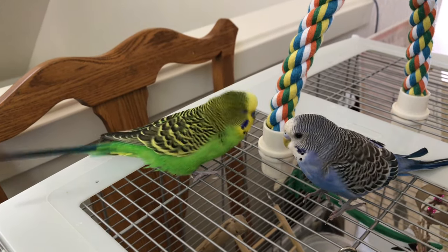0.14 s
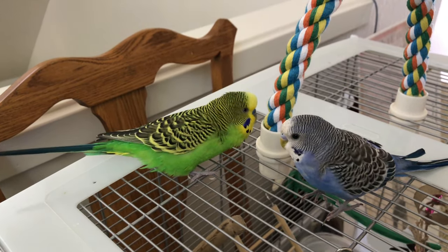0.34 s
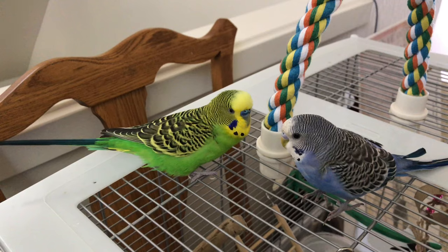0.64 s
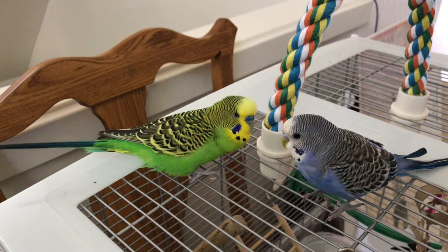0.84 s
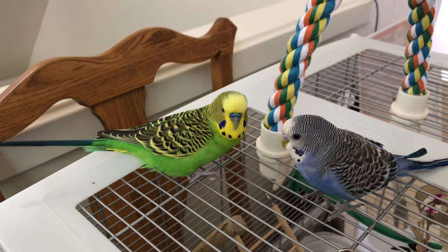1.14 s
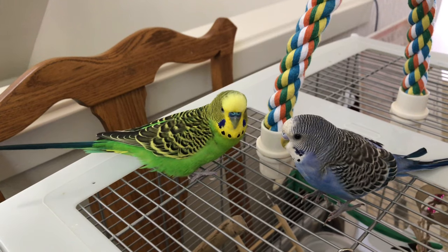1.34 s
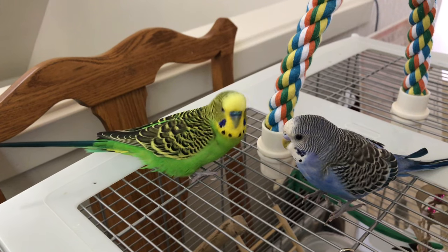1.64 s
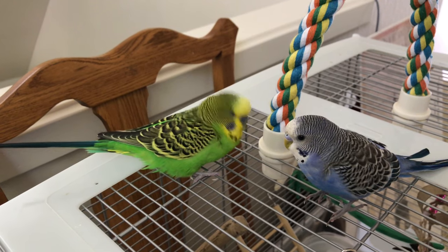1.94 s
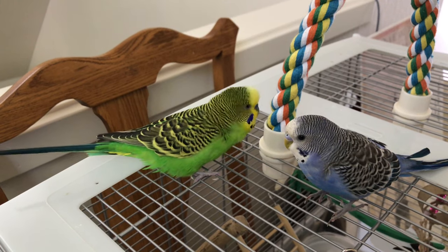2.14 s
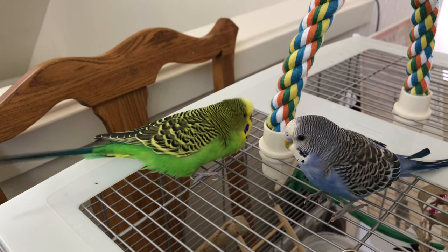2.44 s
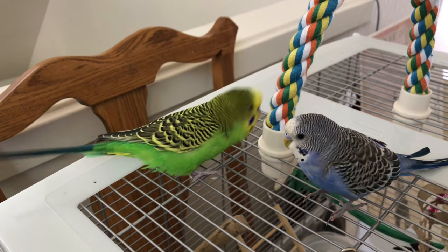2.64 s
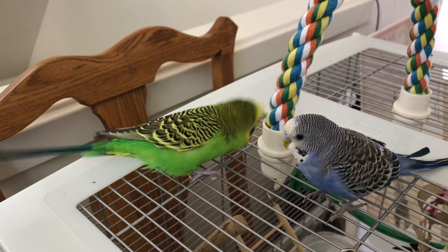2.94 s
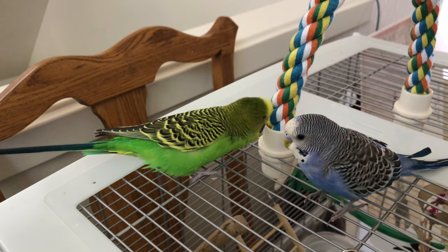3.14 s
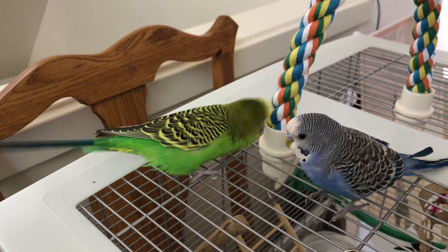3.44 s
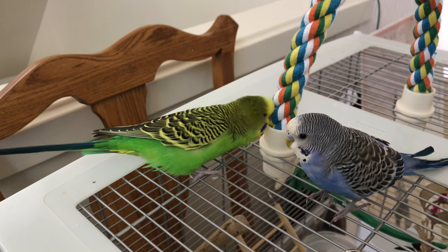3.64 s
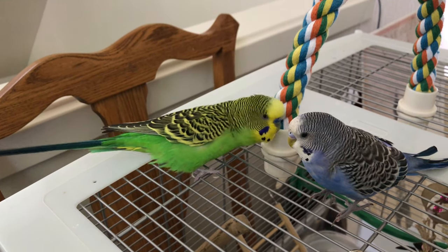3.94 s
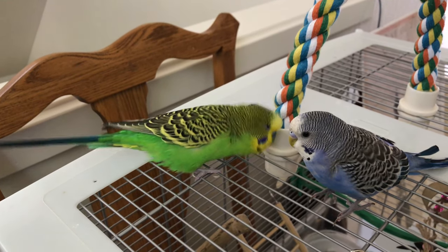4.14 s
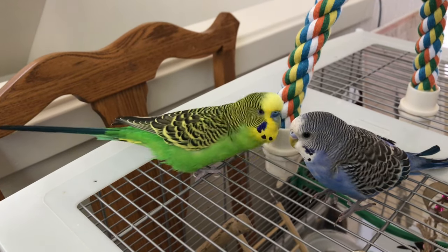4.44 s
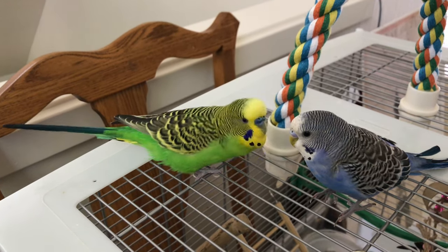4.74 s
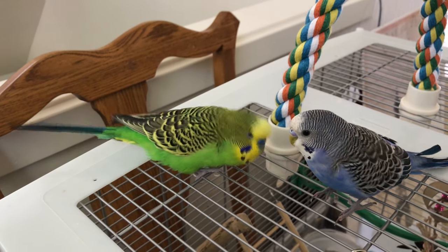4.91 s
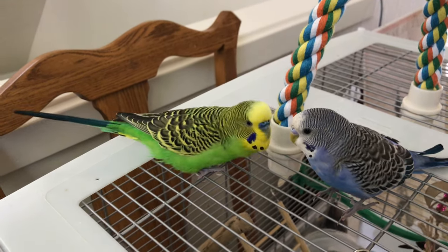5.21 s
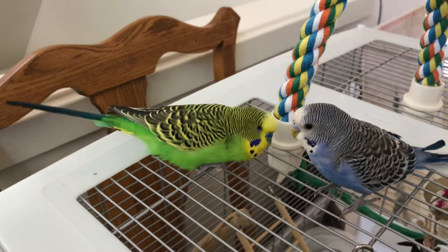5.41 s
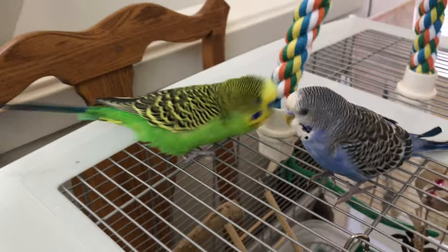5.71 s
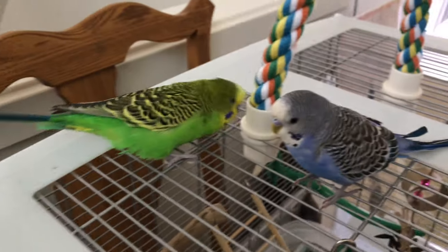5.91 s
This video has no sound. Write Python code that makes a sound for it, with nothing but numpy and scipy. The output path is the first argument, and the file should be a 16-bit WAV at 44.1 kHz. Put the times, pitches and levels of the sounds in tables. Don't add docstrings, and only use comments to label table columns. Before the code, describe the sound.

One small parrot sings close to a phone in a bare, lightly ringing room. A dry double click and tiny creak lead into a rapid bubbling trill, and the pattern repeats. Sparse clicks and slippery whistles follow, then a high ping, a hissing rasp and a dull chirp. A harsh squawk breaks out, and after it come evenly spaced buzzy chirps, several rising. A faint low hum stays underneath, with slight handling rumble late.

```python
import sys
import numpy as np
from scipy import signal
from scipy.fft import rfft, irfft, next_fast_len
from scipy.io import wavfile
from scipy.ndimage import uniform_filter1d

SR = 44100
rng = np.random.default_rng(int(sys.argv[2]) if len(sys.argv) > 2 else 0)


def wrap_up_sound(samples):
    columns = np.atleast_2d(samples).T
    tamed = np.clip(columns, -1, 1)
    steps = np.round(tamed * 32767).astype(np.int16)
    wavfile.write(sys.argv[1], SR, steps)


def amplitude_ratio(level_db):
    exponent = np.asarray(level_db, float) / 20
    return 10 ** exponent


N = 267598

# (time [s], pulse rate [Hz], chest level [dB])
RISING_CHIRPS = [
    [(3.727, 775, -52), (3.735, 787, -44), (3.757, 733, -50), (3.777, 821, -47.5), (3.805, 975, -50.5),
     (3.828, 1047, -52), (3.852, 1032, -47)],
    [(4.101, 772, -51), (4.109, 799, -41.5), (4.123, 755, -41.5), (4.151, 768.4, -44.5), (4.191, 831, -47),
     (4.232, 994, -50), (4.25, 967, -49)],
    [(5.688, 833, -40), (5.697, 833, -41), (5.703, 751, -40), (5.736, 846, -44.5), (5.748, 836, -47),
     (5.794, 1020, -51.5), (5.822, 1058, -47.5), (5.831, 1080, -47)],
]
# (time [s], windpipe level [dB], windpipe [Hz], mouth level [dB], mouth [Hz])
RISING_THROAT = [
    [(3.727, -43, 2620, -40, 3720), (3.733, -35, 2600, -42, 3660), (3.741, -44, 2730, -36, 3640),
     (3.773, -49, 2950, -40, 3920), (3.797, -54, 2940, -49.5, 4370), (3.827, -64, 3040, -50, 4470),
     (3.843, -37.5, 3070, -50, 4140), (3.852, -63, 3080, -66, 4150)],
    [(4.101, -38, 2610, -54, 3800), (4.111, -33.5, 2730, -35, 3800), (4.147, -53, 2560, -38.5, 3820),
     (4.205, -55.5, 2660, -48.5, 3900), (4.241, -41.5, 2800, -45, 3700), (4.25, -54, 2930, -68, 3920)],
    [(5.688, -47, 2620, -44, 4050), (5.696, -39.5, 2540, -35.5, 4160), (5.746, -49, 3200, -41, 4020),
     (5.764, -58, 3140, -52, 4340), (5.806, -50, 3220, -41.5, 4340), (5.82, -40, 3150, -53, 4150),
     (5.831, -64, 3140, -61, 4160)],
]
# (time [s], pulse rate [Hz], chest level [dB])
HELD_CHIRPS = [
    [(4.47, 946, -45), (4.478, 906, -44.5), (4.5, 930, -40), (4.536, 861, -43.5), (4.604, 838, -45),
     (4.617, 863, -48)],
    [(4.885, 778, -43), (4.895, 832, -38.5), (4.933, 781, -40.5), (4.967, 788, -45), (5.015, 823, -43),
     (5.027, 788, -47)],
    [(5.298, 700, -44), (5.304, 753, -44), (5.328, 818, -41), (5.356, 781, -43.5), (5.434, 887, -47),
     (5.445, 831, -50)],
]
# (time [s], windpipe level [dB], windpipe [Hz], mouth level [dB], mouth [Hz])
HELD_THROAT = [
    [(4.47, -58, 2760, -69, 4200), (4.476, -43.5, 2800, -41.5, 3890), (4.5, -44, 2840, -36.5, 4840),
     (4.53, -43, 2900, -43, 5080), (4.59, -48.5, 2550, -44.5, 4600), (4.608, -37.5, 2550, -54, 4020),
     (4.617, -45.5, 2570, -72, 3840)],
    [(4.885, -35, 3180, -44, 4180), (4.895, -46, 3120, -32, 4400), (4.907, -52, 3120, -38.5, 4560),
     (4.961, -51.5, 2370, -44, 4870), (5.005, -44, 2900, -67.5, 4460), (5.019, -43.5, 2740, -74.5, 4330),
     (5.027, -60.5, 2890, -72, 4280)],
    [(5.298, -53.5, 3070, -57, 3960), (5.304, -47, 3050, -50, 3900), (5.316, -41.5, 3000, -40, 4030),
     (5.35, -51, 2780, -40, 4100), (5.4, -48, 2770, -53.5, 3930), (5.428, -51, 2630, -47, 3400),
     (5.438, -37.5, 2640, -52, 3520), (5.445, -55, 2650, -66, 3460)],
]
# (time [s], pulse rate [Hz], chest level [dB])
DULL_CHIRP = [
    [(2.923, 706, -45.5), (2.938, 705, -36), (2.982, 628, -49.5), (3.0, 699, -43.5), (3.034, 922, -51.5),
     (3.046, 937, -55)],
]
# (time [s], windpipe level [dB], windpipe [Hz], mouth level [dB], mouth [Hz])
DULL_THROAT = [
    [(2.923, -48, 1850, -49, 2920), (2.941, -31, 1820, -46.5, 3030), (2.977, -37.5, 1870, -51, 2980),
     (2.993, -46.5, 1940, -59, 3030), (3.046, -68, 1920, -71, 3000)],
]
# (time [s], pulse rate [Hz], chest level [dB])
MUFFLED_CHIRPS = [
    [(4.361, 1110, -76), (4.369, 1180, -45.5), (4.376, 1118, -54), (4.38, 1077, -49), (4.387, 1050, -55)],
    [(5.948, 988, -51), (5.97, 954, -51.5), (5.976, 910, -54)],
    [(6.06, 890, -70), (6.068, 834, -40)],
]
# (windpipe level [dB], windpipe [Hz], mouth level [dB], mouth [Hz], windpipe at shutting [dB])
MUFFLED_THROAT = [(-42, 2250, -73, 4400, -42), (-48, 2200, -57.5, 3270, -62), (-37.5, 3150, -36, 4200, -60)]
# (windpipe fade [dB/s], mouth fade [dB/s], windpipe follows pitch [exponent], beak air [dB])
MUFFLED_MOVES = (350, 280, 1.3, -26)
# (time [s], pulse rate [Hz], chest level [dB])
CREAKS = [
    [(.111, 512, -54), (.128, 491, -51.5), (.135, 520, -49), (.1395, 510, -45)],
    [(.672, 480, -57), (.685, 440, -51), (.694, 506, -52.5), (.7035, 527, -49)],
]
# (time [s], windpipe level [dB], windpipe [Hz], mouth level [dB], mouth [Hz])
CREAK_THROAT = [
    [(.111, -71, 1000, -64, 3000), (.124, -64, 1000, -55, 2920), (.133, -60, 1400, -44.5, 2200),
     (.1395, -54, 1500, -47, 1900)],
    [(.672, -61, 900, -60, 2800), (.685, -49, 900, -49, 1820), (.694, -52, 990, -44.5, 2120),
     (.7035, -51, 1100, -38, 1500)],
]
# (time [s], pulse rate [Hz], effort [dB], mouth [Hz])
RASP = [(2.378, 229.4, -39.5, 3570), (2.388, 230.4, -32.5, 4560), (2.403, 227.4, -31.5, 5100),
        (2.43, 230.5, -40.5, 4380), (2.458, 227.6, -51, 4480), (2.501, 230, -60.5, 4400)]
# (chest level [dB], windpipe level [dB], windpipe [Hz], mouth level [dB], beak air [dB])
RASP_THROAT = (-60, -13.5, 2399, 4, -19)
# (time [s], pulse rate [Hz], effort [dB])
SCRAPE = [
    [(1.506, 230, -63), (1.536, 224.6, -48), (1.556, 232, -66)],
]
# (time [s], pulse rate [Hz], effort [dB])
LEAK = [
    [(.162, 226.4, -67), (.172, 226, -60), (.184, 226.4, -70)],
    [(.725, 232, -58), (.74, 232.6, -59), (.749, 237, -60)],
    [(.957, 235, -51), (.963, 238, -59), (.976, 231.3, -71)],
]
# (time [s], pulse rate [Hz], effort [dB])
PUFF = [
    [(1.797, 228, -76), (1.802, 233, -68), (1.813, 228, -71)],
    [(3.528, 230, -73), (3.54, 233, -66), (3.553, 230, -76)],
]
# (chest level [dB], windpipe level [dB], windpipe [Hz], mouth level [dB], mouth [Hz], beak air [dB])
SCRAPE_THROAT = (-40, -1.5, 2137, -38, 3700, -9)
LEAK_THROAT = (-44, -2, 2901, -19, 4500, -11.5)
PUFF_THROAT = (-40, -40, 2000, -40, 4000, 0.5)
# (time [s], slap rate [Hz], effort [dB], mouth [Hz], mouth ring [ms])
SQUAWK = [(3.446, 302, -21.5, 3530, 0.77), (3.4519, 314, -16.5, 4000, 0.4), (3.459, 328, -20.5, 3940, 1.9),
          (3.467, 328.7, -20.5, 3830, 2.1), (3.474, 326, -26.5, 4150, 1.8), (3.483, 337, -30, 4060, 2),
          (3.491, 350, -39, 4000, 1.4), (3.53, 520, -49.5, 3920, 1.2)]
# (time [s], peak level [dB], mouth [Hz])
SLAPS = [(3.4283, -41.5, 4300), (3.43, -28.5, 3420), (3.434, -28, 2500), (3.4352, -34, 3600),
         (3.4385, -28, 3300), (3.4394, -36, 2200), (3.4404, -35, 3600), (3.4435, -29.5, 4300)]
# (frequency [Hz], level against the effort [dB], ring time [ms])
SQUAWK_MODES = [(930, -20, 1.0), (2800, -24, 0.83), (4780, -11.5, 0.58), (6900, -13.5, 0.27)]
# (start [s], loudest [s], end [s], level [dB], pitch [Hz])
TRILL = [(0.206, 0.217, 0.23, -35, 1634), (0.255, 0.262, 0.27, -42, 1580), (.302, 0.301, .326, -41.5, 1597),
         (0.342, 0.348, .375, -36.5, 1662), (.7645, .772, .795, -36, 1620),
         (0.8175, 0.832, .846, -35, 1620), (0.867, 0.873, .895, -38, 1602),
         (0.9135, 0.929, 0.941, -38, 1618)]
# (time [s], pitch [Hz], level [dB])
WHISTLES = [
    [(1.515, 1812, -57), (1.539, 1546, -46), (1.556, 1410, -83)],
    [(1.762, 2275, -42.5), (1.775, 1835, -39), (1.788, 1990, -44.5), (1.792, 1840, -40.5),
     (1.798, 1760, -46.5)],
    [(1.836, 2070, -70), (1.844, 2200, -55.5), (1.858, 2060, -81)],
    [(2.262, 3790, -57), (2.279, 3960, -49.5), (2.286, 2900, -36.5), (2.29, 2300, -39.5),
     (2.3, 1990, -44.5), (2.308, 2150, -53), (2.312, 2020, -41.5), (2.319, 2240, -45.5)],
    [(2.32, 3120, -35.5), (2.322, 3150, -30.5), (2.324, 3150, -33.5), (2.3275, 3177, -22),
     (2.3295, 3140, -24), (2.3335, 3150, -41)],
]
# (time [s], pitch [Hz], level [dB])
THROBBING = [
    [(2.333, 2700, -38), (2.337, 2960, -34), (2.34, 3170, -28.5), (2.346, 3050, -48.5)],
    [(2.369, 3100, -42), (2.372, 3380, -35.5), (2.378, 3460, -49)],
]
# (time [s], pitch [Hz], level [dB])
MURMURS = [
    [(2.095, 497, -53.5), (2.127, 491, -52), (2.159, 540, -57), (2.172, 560, -61)],
    [(2.638, 616, -55), (2.668, 489, -54), (2.68, 455, -57), (2.75, 388, -68)],
]
# (time [s], pitch [Hz], level [dB])
SQUEAKS = [
    [(1.748, 3560, -70.5), (1.757, 3330, -60), (1.765, 3380, -62.5)],
    [(1.801, 2980, -51), (1.809, 2905, -49), (1.826, 2764, -55.5)],
]
# (time [s], pitch [Hz], level [dB])
CLUCK = [
    [(2.6306, 2110, -56), (2.633, 1730, -23), (2.636, 1420, -36), (2.642, 1516, -49)],
]
# (time [s], pitch [Hz], level [dB], upper tone against it [dB])
BURRS = [
    [(.1555, 1700, -30, -2), (.158, 1700, -36, -5), (.1615, 1650, -53, -9)],
    [(.1625, 1630, -38, -7), (.169, 1700, -30, -10.5), (.176, 1530, -41, -7), (.183, 1446, -41, -1),
     (.187, 1430, -50, -6)],
    [(.718, 1510, -46, 1), (.7225, 1560, -35, 0), (.7245, 1600, -42, -1)],
    [(.7255, 1635, -43, -12), (.732, 1705, -30, -6), (.7415, 1660, -38, -9), (.745, 1710, -27.5, -11.5),
     (.753, 1600, -52, -14)],
]
# (time [s], pitch [Hz], level [dB])
BURR_HUM = [
    [(.163, 510, -65), (.174, 496, -51.5), (.186, 477, -60)],
    [(.726, 514, -56), (.738, 473, -49), (.75, 510, -65)],
    [(3.47, 326, -54), (3.5, 448, -54), (3.537, 662, -65)],
]
# (time [s], peak level [dB], ring [Hz], ring time [ms])
RINGING_POPS = [(0.2007, -25.5, 1810, 3.7), (0.2493, -35, 1840, 2.6), (0.2934, -37, 1860, 5.4),
                (.388, -36.5, 2100, 3.6), (0.816, -38, 1830, 3.2), (0.8604, -35, 1920, 5),
                (0.9093, -37.5, 1850, 3.6), (0.955, -34, 2185, 4.9), (1.178, -60.5, 1510, 6.3),
                (2.348, -32.5, 2530, 4.8), (2.354, -33, 2490, 4.2), (2.361, -38.5, 2480, 8.4)]
# (time [s], peak level [dB], ring [Hz], crack against the ring [dB])
CRACKING_POPS = [(1.505, -55.5, 4380, 11.5), (1.523, -48, 3030, 2), (1.534, -45, 3020, -4),
                 (1.5397, -53.5, 2760, 9), (2.0849, -45.5, 4730, 5.5), (2.134, -61, 4350, 7.5),
                 (2.4966, -43.5, 2200, -5), (2.6321, -34.5, 3200, 8)]
# (time [s], peak level [dB], ring [Hz], ring time [ms])
SNAPS = [(0.106, -42, 2350, 0.29), (0.1083, -29.5, 2370, 1.6), (0.1081, -31, 4850, 0.63),
         (0.6673, -40.5, 2860, 0.65), (0.6687, -36.5, 1720, 0.34), (2.0796, -28.5, 2440, 0.32),
         (2.0813, -36, 2300, 0.27), (2.9207, -31, 2000, 0.47), (2.9212, -36, 2520, 0.99),
         (2.9199, -31.5, 2240, 0.99), (3.1716, -36, 4170, 0.29), (3.7216, -30, 2900, 1.1),
         (4.0949, -28.5, 2950, 1.5), (4.0957, -35, 1700, .8), (4.3504, -32, 2480, 0.14),
         (4.4596, -31.5, 2090, 0.48), (4.462, -31.5, 2040, 0.76), (4.4625, -35, 2130, 0.41),
         (4.8735, -18.5, 3850, 0.38), (4.8744, -13, 4160, 0.95), (4.8755, -22, 1900, 1.03),
         (5.2881, -28, 2200, 0.89), (5.2896, -29, 1900, 0.5), (5.6812, -30.5, 2540, 0.83),
         (5.6834, -24.5, 2640, 0.89), (5.9373, -35.5, 2600, 0.74), (6.0524, -37.5, 3000, 0.28)]
# (frequency [Hz], level [dB])
BEAK_AIR = [(4300, -23), (5500, -6.5), (6400, -1.5), (8600, 1), (11000, -5), (13000, -11.5), (16000, -12)]
# (frequency [Hz], level [dB])
CRACK = [(500, -48), (1300, 6), (3000, 0.5), (5400, -6), (6500, -14), (9000, -18), (16000, -36)]
# (frequency [Hz], level [dB])
WALLS = [(300, -16), (1000, 2.5), (2000, 0), (4500, -1), (7000, 0), (16000, -10)]
# (frequency [Hz], density [dB per Hz])
AIR = [(20, -49), (49, -16.5), (92, -11), (115, -9), (320, -7), (620, -16), (2050, -29.5), (16000, -40)]
# (frequency [Hz], density [dB per Hz])
AIR_SIDE = [(20, -34), (127, -4), (354, -6), (451, -9), (700, -14), (3250, -28.5), (12500, -35),
            (16000, -50)]
# (frequency [Hz], centre level [dB], side level [dB], wander [Hz])
HUM = [
    (119.8, -65, -99, 0.48),
    (459.1, -63.5, -76.5, 0.37),
]
# (time [s], level [dB])
GRIP = [
    [(1.24, -80), (1.274, -59), (1.31, -79)],
    [(4.98, -89), (5.07, -65.5), (5.352, -55), (5.56, -66.5), (5.644, -73.5), (6.068, -71.5)],
]
# (centre [Hz], width [Hz], level [dB])
GRIP_BANDS = [
    (62, 34, -1.5),
    (131.5, 32, 6),
]


def on_log(hz, points):
    f, db = np.transpose(points)
    return amplitude_ratio(np.interp(np.log(np.maximum(hz, 1)), np.log(f), db))


def colour(x, points):
    size = next_fast_len(x.shape[-1])
    gain = on_log(np.fft.rfftfreq(size, 1 / SR), points)
    y = irfft(rfft(x, size) * gain, size)[..., :x.shape[-1]]
    return y / np.sqrt(np.mean(y ** 2))


def band(x, order, hz, kind):
    return signal.sosfilt(signal.butter(order, hz, kind, fs=SR, output="sos"), x)


def walk(rate_hz, size):
    k = max(int(SR / rate_hz), 1)
    steps = np.repeat(rng.standard_normal(size // k + 1), k)[:size]
    return np.sqrt(2) * uniform_filter1d(uniform_filter1d(steps, k), k)


def unfold(note, edge_s):
    s, *columns = np.transpose(note)
    t = np.arange(int(s[0] * SR), min(int(s[-1] * SR), N)) / SR
    edge = np.clip(np.minimum(t - s[0], s[-1] - t) / edge_s, 0, 1)
    return int(s[0] * SR), np.sin(np.pi / 2 * edge) ** 2, [np.interp(t, s, c) for c in columns]


def unit(gain):
    return gain / np.sqrt(np.sum(np.abs(gain) ** 2, axis=0) / 2)


def resonance(hz, centre_hz, width_hz):
    ring = 1 / (1 + 1j * (hz ** 2 - centre_hz ** 2) / (hz * width_hz)) ** 2
    return unit(ring / (1 + (hz / (centre_hz + 0.59 * width_hz)) ** 10))


def buzz(notes, width_hz, jitter, rough, breath, hiss, waver_db=2.0):
    out = np.zeros(N)
    for note in notes:
        i, edge, (hz, chest_db, pipe_db, pipe_hz, mouth_db, mouth_hz, air_db) = unfold(note, 0.002)
        size = len(hz)
        phase = 2 * np.pi * np.cumsum(hz * (1 + jitter * walk(hz.mean() / 2, size))) / SR
        k = np.arange(2, 16000 // hz.min() + 1)[:, None]
        f = k * hz
        pipe = amplitude_ratio(pipe_db) * resonance(f, pipe_hz, width_hz)
        mouth = amplitude_ratio(mouth_db) * resonance(f, mouth_hz, 1.205 * width_hz)
        air = amplitude_ratio(air_db) * unit(on_log(f, BEAK_AIR) * (f < 16500))
        uneven = 1 + rough * walk(hz.mean(), size)
        smear = np.array([walk(hz.mean(), size) + 1j * walk(hz.mean(), size) for _ in k])
        start = 0.22 * np.exp(-np.arange(size) / (0.015 * SR))
        share = breath + start + hiss * np.clip((f - 5000) / 3000, 0, 1) ** 2
        waver = amplitude_ratio(waver_db * np.array([walk(36.2, size) for _ in k]))
        gain = (pipe - mouth + air) * waver
        gain = gain * (1 + share * smear) / np.sqrt(1 + 2 * share ** 2)
        chest = np.cos(phase) + amplitude_ratio(-10.5) * waver[0] * np.sin(2 * phase)
        upper = uneven * np.real(np.sum(gain * np.exp(1j * k * phase), axis=0))
        out[i:i + size] += edge * (upper + amplitude_ratio(chest_db) * np.sqrt(2) * chest)
    return out


def moving_throat(curves, throats, air_db):
    notes = []
    for curve, throat in zip(curves, throats):
        when, hz, chest_db = np.transpose(curve)
        at, *tract = np.transpose(throat)
        s = np.linspace(when[0], when[-1], num=80)
        pipe, pipe_hz, mouth, mouth_hz = (np.interp(s, at, c) for c in tract)
        air = np.maximum(pipe, mouth) + air_db
        hz, chest = np.interp(s, when, hz), np.interp(s, when, chest_db)
        notes.append(np.transpose([s, hz, chest, pipe, pipe_hz, mouth, mouth_hz, air]))
    return notes


def closing_beak(curves, throats, moves):
    opens_s, opens_db = 0.011, -8
    shuts_s, shuts_db, swell_db_s = 0.011, -25, 451
    pipe_fade, mouth_fade, follow, air_db = moves
    notes = []
    for curve, (pipe_db, pipe_hz, mouth_db, mouth_hz, shut_db) in zip(curves, throats):
        when, hz, chest_db = np.transpose(curve)
        s = np.linspace(when[0], when[-1], num=80)
        hz, chest = np.interp(s, when, hz), np.interp(s, when, chest_db)
        age, left = s - s[0] - opens_s, s[-1] - s - shuts_s
        opening = opens_db * np.maximum(-age, 0) / opens_s
        shutting = shuts_db * np.maximum(-left, 0) / shuts_s
        pipe = np.maximum(pipe_db - pipe_fade * abs(age), shut_db - swell_db_s * abs(left))
        mouth = mouth_db + opening - mouth_fade * np.maximum(age, 0) + shutting
        air = np.maximum(mouth, pipe_db + opening - pipe_fade * np.maximum(age, 0)) + air_db
        pipe_hz = pipe_hz * (hz / hz[0]) ** follow
        notes.append(np.transpose([s, hz, chest, pipe, pipe_hz, mouth, mouth_hz + 0 * s, air]))
    return notes


def chirps():
    held = moving_throat(HELD_CHIRPS, HELD_THROAT, -25.5)
    rising = moving_throat(RISING_CHIRPS, RISING_THROAT, -25.5)
    muffled = closing_beak(MUFFLED_CHIRPS, MUFFLED_THROAT, MUFFLED_MOVES)
    dull = moving_throat(DULL_CHIRP, DULL_THROAT, -23.5)
    out = buzz(held, 1350, jitter=0.003, rough=0.07, breath=0.08, hiss=1, waver_db=2)
    out += buzz(rising, 1150, jitter=0.004, rough=0.1, breath=0.09, hiss=2.2, waver_db=2.5)
    out += buzz(muffled, 700, jitter=0.012, rough=0.15, breath=0.1, hiss=2.2, waver_db=2.2)
    return out + buzz(dull, 1350, jitter=0.004, rough=0.06, breath=0.08, hiss=4, waver_db=1)


def effort_notes(curves, throat):
    chest_db, pipe_db, pipe_hz, mouth_db, mouth_hz, air_db = throat
    notes = []
    for s, hz, db in map(np.transpose, curves):
        air = db + air_db + 0.25 * (db - db.max())
        notes.append(np.transpose([s, hz, db + chest_db, db + pipe_db, pipe_hz + 0 * s,
                                   db + mouth_db, mouth_hz + 0 * s, air]))
    return notes


def creaks_and_rasps():
    creaks = moving_throat(CREAKS, CREAK_THROAT, -23)
    rasp = np.array(RASP)
    rasp = effort_notes([rasp[:, :3]], (*RASP_THROAT[:4], rasp[:, 3], RASP_THROAT[4]))
    leaks = effort_notes(LEAK, LEAK_THROAT) + effort_notes(SCRAPE, SCRAPE_THROAT)
    leaks += effort_notes(PUFF, PUFF_THROAT)
    out = buzz(creaks, 1300, jitter=0.03, rough=0.2, breath=0.22, hiss=0.9)
    out += buzz(rasp, 1900, jitter=0.04, rough=0.08, breath=1.1, hiss=0.9, waver_db=1)
    return out + buzz(leaks, 2000, jitter=0.04, rough=0.2, breath=1.1, hiss=0.9)


def squawk():
    s, rate_hz, *rest = np.transpose(SQUAWK)
    t = np.arange(s[0], s[-1], 1 / SR)
    cycle = np.floor(np.cumsum(np.interp(t, s, rate_hz)) / SR)
    at = t[np.flatnonzero(np.diff(cycle, prepend=-1))]
    effort, mouth_hz, ring_ms = (np.interp(at, s, c) for c in rest)
    low = 0.66 * (max(rest[0]) - effort)
    rows = [(*row, 0.63, 16) for row in SLAPS]
    rows += list(zip(at, effort, mouth_hz, ring_ms, low))
    out, t = np.zeros(N), np.arange(1024) / SR
    puffs = colour(rng.standard_normal((len(rows), 1024)), CRACK)
    scatter = rng.standard_normal((len(rows), 7))
    shut = np.exp(-(t / 0.0028) ** 4)

    def ring(hz, ms):
        return np.sin(2 * np.pi * hz * t) * np.exp(-t * 1000 / ms) * shut

    for (when, db, hz, ms, low_db), puff, luck in zip(rows, puffs, scatter):
        slap = ring(hz * (1 + 0.02 * luck[0]), ms) + amplitude_ratio(-18) * puff * np.exp(-t / 0.0015)
        for (f, mode_db, mode_ms), c in zip(SQUAWK_MODES, luck[3:]):
            slap += amplitude_ratio(mode_db + low_db * (f < 1500) + 2 * c) * ring(f * (1 + 0.03 * c), mode_ms)
        i = int((when + 0.0001 * luck[1]) * SR)
        out[i:i + len(t)] += amplitude_ratio(db + luck[2]) * slap * (1 - np.exp(-t / 0.000061))
    return band(out, 2, 500, "high")


def whistle(notes, throb, throb_hz, rough, second_db):
    out = np.zeros(N)
    for note in notes:
        i, edge, (hz, db) = unfold(note, 0.0016)
        size = len(hz)
        beat = np.cumsum(throb_hz * (1 + 0.14 * walk(80, size))) / SR
        sag = 1 - 0.032 * throb * (beat % 1 - 0.5)
        phase = 2 * np.pi * np.cumsum(hz * sag * (1 + 0.011 * walk(340, size))) / SR
        swell = 1 - throb * np.cos(2 * np.pi * beat) + rough * walk(1500, size)
        over = amplitude_ratio(second_db) * (np.sin(2 * phase) + 0.17 * np.sin(3 * phase))
        over = over * (1 + 4 * rough * walk(800, size))
        out[i:i + size] += edge * amplitude_ratio(db) * np.sqrt(2) * swell * (np.sin(phase) + over)
    return out


def trill():
    hold_s, slope_db_s, sag_hz_s = 0.0011, 385, 2000
    notes = []
    for start, loudest, end, top_db, hz in TRILL:
        s = np.linspace(start, end, num=40)
        db = top_db - slope_db_s * np.maximum(abs(s - loudest) - hold_s, 0)
        notes.append(np.transpose([s, hz - sag_hz_s * (s - loudest), db]))
    return whistle(notes, 0.12, 110, 0.05, -33)


def burrs():
    beat_hz, under_db = 487, -26.5
    notes = []
    for s, hz, db, up_db in map(np.transpose, BURRS):
        notes.append(np.transpose([s, hz, db]))
        notes.append(np.transpose([s, hz + beat_hz, db + up_db]))
        notes.append(np.transpose([s, hz - beat_hz, db + under_db]))
    return whistle(notes, 0.05, 250, 0.08, -40)


def whistles():
    out = trill() + burrs()
    out += whistle(WHISTLES, 0.15, 140, 0.1, -40)
    out += whistle(THROBBING, 0.6, 170, 0.15, -36)
    out += whistle(MURMURS + BURR_HUM, 0.13, 56, 0.24, -13.5)
    out += whistle(SQUEAKS, 0.39, 140, 0.2, -23.5)
    return out + band(whistle(CLUCK, 0.05, 140, 0.09, -2), 3, 1600, "high")


def pops():
    rows = [(*row, -26) for row in RINGING_POPS]
    rows += [(s, db, hz, 3.2, crack_db) for s, db, hz, crack_db in CRACKING_POPS]
    out, t = np.zeros(N + 2048), np.arange(2048) / SR
    cracks = colour(rng.standard_normal((len(rows), 2048)), CRACK)
    rise = 1 - np.exp(-t / 0.00028)
    for (s, db, hz, ring_ms, crack_db), noise in zip(rows, cracks):
        ring = np.sin(2 * np.pi * hz * t * (1.05 - 12 * t)) * np.exp(-(t * 1000 / ring_ms) ** 3.3)
        noise = band(noise, 2, 0.55 * hz, "high")
        crack = amplitude_ratio(crack_db) * noise * (np.exp(-t / 0.0013) + 0.23 * np.exp(-t / 0.0094))
        out[int(s * SR):int(s * SR) + 2048] += amplitude_ratio(db) * rise * (ring + crack)
    return out[:N]


def snaps():
    out, t = np.zeros(N + 2048), np.arange(2048) / SR
    puffs = colour(rng.standard_normal((len(SNAPS), 2048)), CRACK)
    edge = amplitude_ratio(-28.5) * np.sin(2 * np.pi * 8500 * t) * np.exp(-t / 0.000058)
    for (s, db, hz, ring_ms), noise in zip(SNAPS, puffs):
        fade = np.exp(-t * 1000 / ring_ms)
        upper_hz = min(2.008 * hz, 5530)
        upper = amplitude_ratio(-10.5) * fade * np.sin(2 * np.pi * upper_hz * t)
        ring = fade * (np.sin(2 * np.pi * hz * t) + upper)
        air = amplitude_ratio(-16.5) * noise * np.exp(-t / 0.0042)
        out[int(s * SR):int(s * SR) + 2048] += amplitude_ratio(db) * (ring + edge + air)
    return band(out[:N], 2, (700, 9000), "band")


def at_ports(bird):
    pan_db = 1.5
    wires = rng.standard_normal(1200) * np.exp(-np.arange(1200) / 250)
    treble = band(bird, 2, (6500, 10900), "band")
    treble = treble + amplitude_ratio(-9.5) * band(bird, 2, (2200, 6500), "band")
    scatter = amplitude_ratio(-5) * signal.fftconvolve(treble, wires / np.linalg.norm(wires))[:N]
    return bird * amplitude_ratio(np.array([[0.5], [-0.5]]) * pan_db) + scatter * np.array([[1], [-1]])


def walls(x):
    gap_s, level_db, side_db = 0.0011, -18, -7
    t = np.arange(SR) / SR
    far = 1000. ** (-t / 0.56)
    near = amplitude_ratio(8) * 1000. ** (-t / 0.07)
    mid, side = colour(rng.standard_normal((2, SR)), WALLS) * (t > gap_s) * (far + near)
    scale = amplitude_ratio(level_db) / np.sqrt(np.sum(mid ** 2))
    side = side * amplitude_ratio(side_db)
    return np.array([signal.fftconvolve(x, scale * tail)[:N] for tail in (mid + side, mid - side)])


def grip():
    s, db = np.transpose(sum(GRIP, []))
    n = np.arange(N)
    held = np.any([(n > g[0][0] * SR) & (n < g[-1][0] * SR) for g in GRIP], axis=0)
    level = uniform_filter1d(held * amplitude_ratio(np.interp(n / SR, s, db)), size=600)
    bands = []
    for hz, width_hz, band_db in GRIP_BANDS:
        b, a = signal.iirpeak(hz, hz / width_hz, fs=SR)
        rumble = signal.lfilter(b, a, signal.lfilter(b, a, rng.standard_normal(N)))
        bands.append(amplitude_ratio(band_db) * level * rumble / np.std(rumble))
    return np.array([bands[0] + bands[1], bands[0] - bands[1]])


def room_tone():
    mid = amplitude_ratio(-62.5) * colour(rng.standard_normal(N), AIR)
    side = amplitude_ratio(-71) * colour(rng.standard_normal(N), AIR_SIDE)
    for hz, mid_db, side_db, wander_hz in HUM:
        phase = 2 * np.pi * np.cumsum(hz + wander_hz * walk(2.886, N)) / SR
        mid = mid + amplitude_ratio(mid_db + 1.2 * walk(6, N)) * np.sqrt(2) * np.sin(phase)
        side = side + amplitude_ratio(side_db + 1.2 * walk(6, N)) * np.sqrt(2) * np.sin(phase + 0.45)
    return np.array([mid + side, mid - side])


def scene():
    bird = chirps() + creaks_and_rasps() + squawk() + whistles() + pops() + snaps()
    return at_ports(bird) + walls(bird) + grip() + room_tone()


def roll_off(x):
    return signal.sosfilt(signal.butter(12, 16490, fs=SR, output="sos"), x)


def record(dry):
    top_cut = signal.ellip(8, 0.2, 60, 15900, fs=SR, output="sos")
    mix = signal.sosfilt(top_cut, dry)
    return roll_off(mix)


dry = scene()
out = record(dry)
wrap_up_sound(out)
```